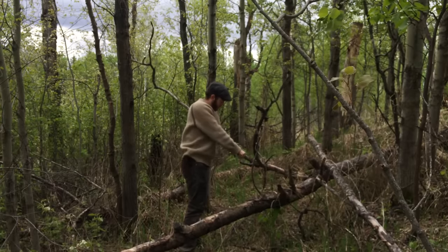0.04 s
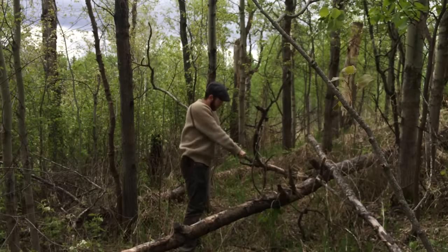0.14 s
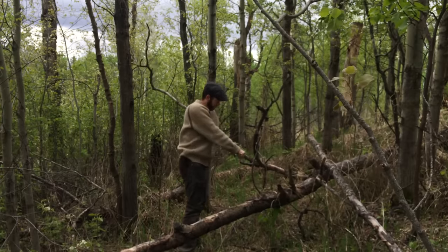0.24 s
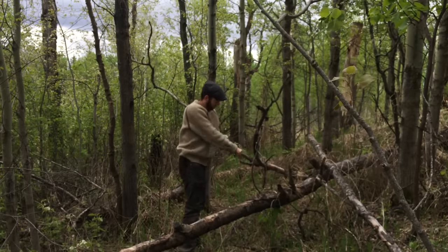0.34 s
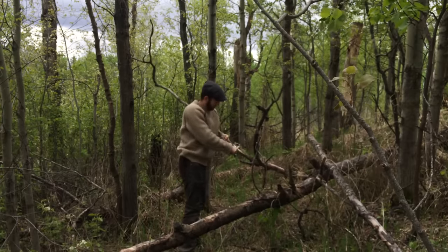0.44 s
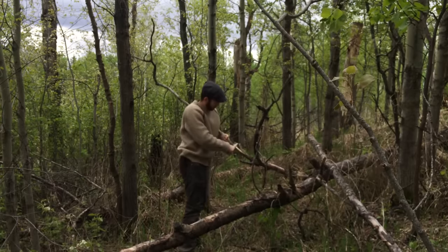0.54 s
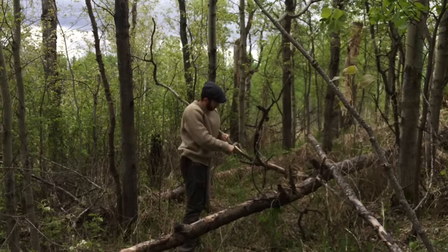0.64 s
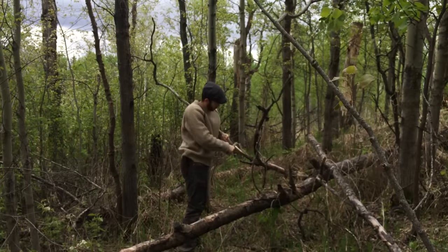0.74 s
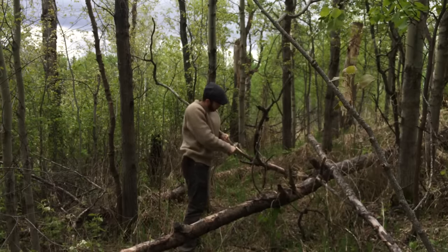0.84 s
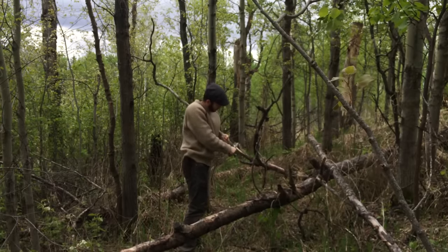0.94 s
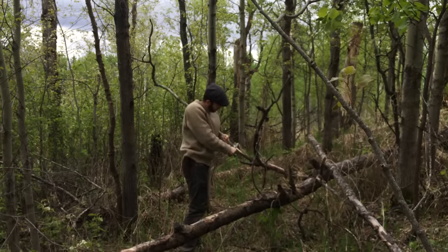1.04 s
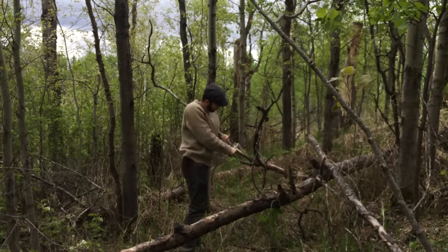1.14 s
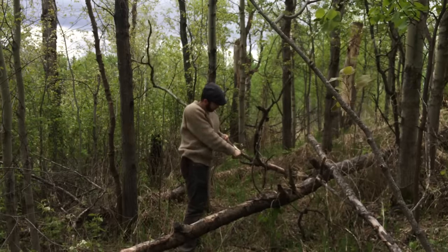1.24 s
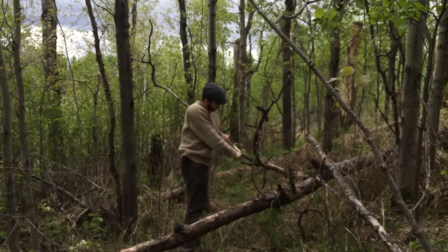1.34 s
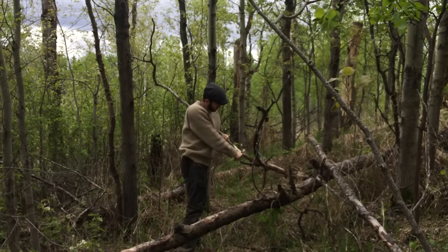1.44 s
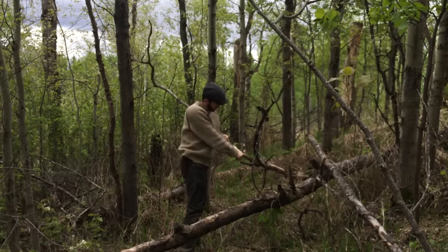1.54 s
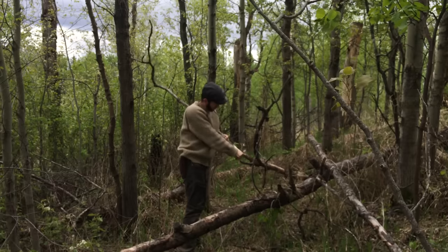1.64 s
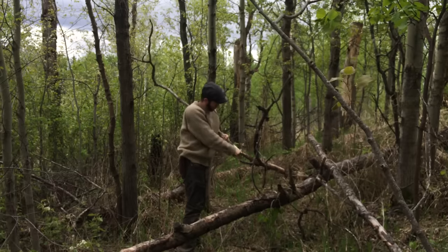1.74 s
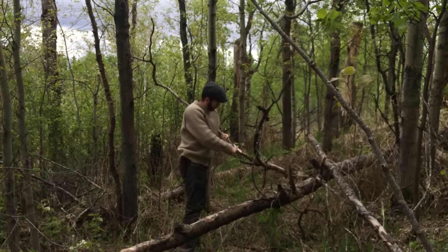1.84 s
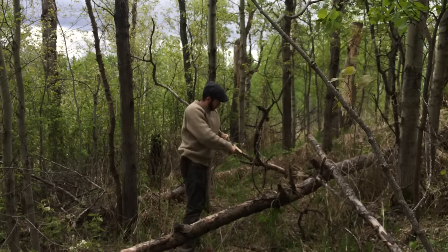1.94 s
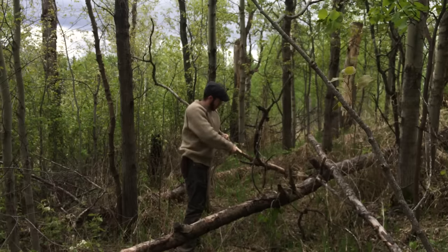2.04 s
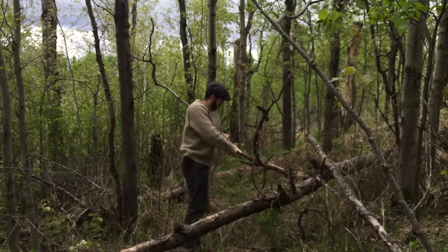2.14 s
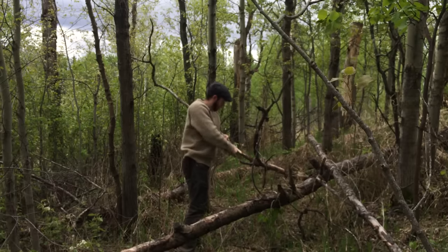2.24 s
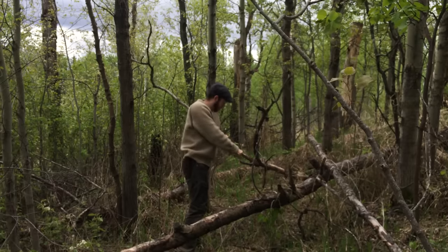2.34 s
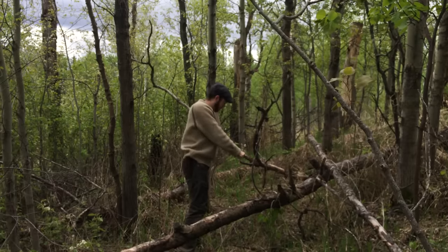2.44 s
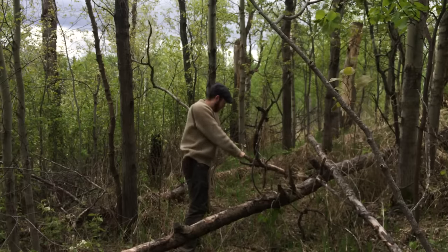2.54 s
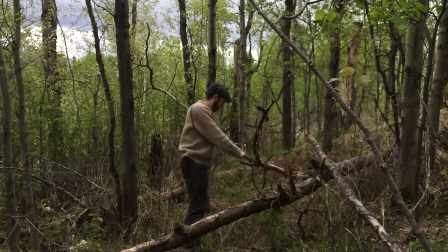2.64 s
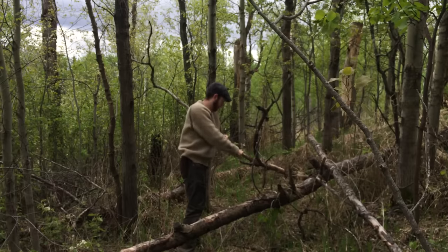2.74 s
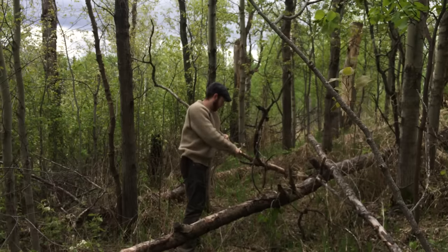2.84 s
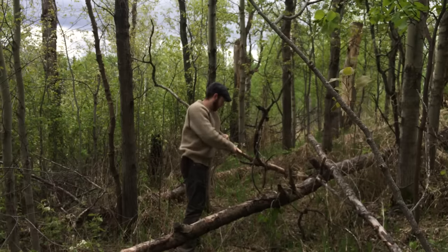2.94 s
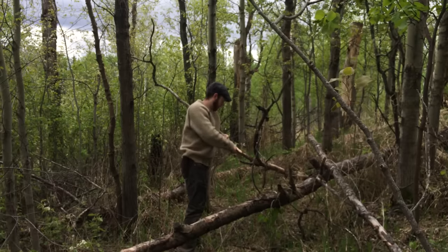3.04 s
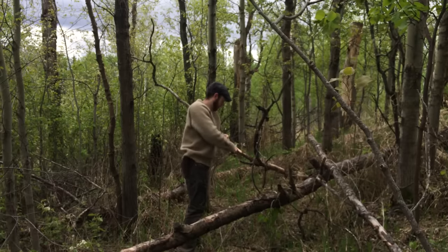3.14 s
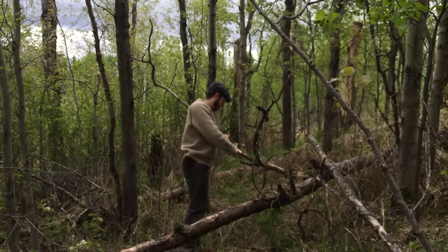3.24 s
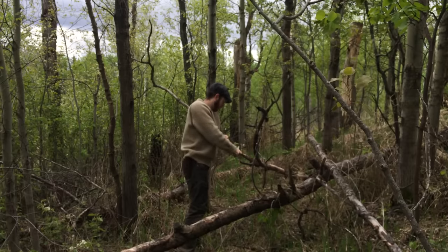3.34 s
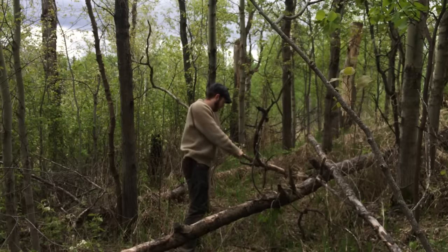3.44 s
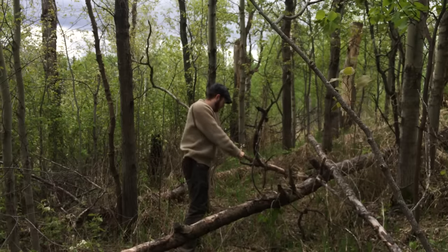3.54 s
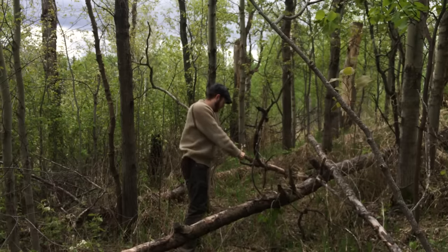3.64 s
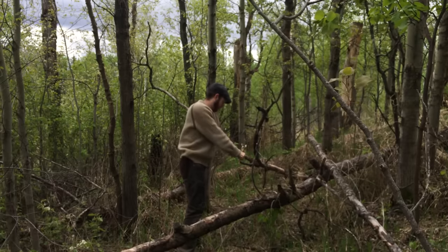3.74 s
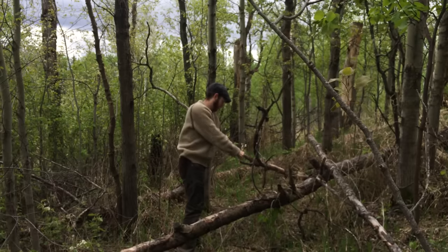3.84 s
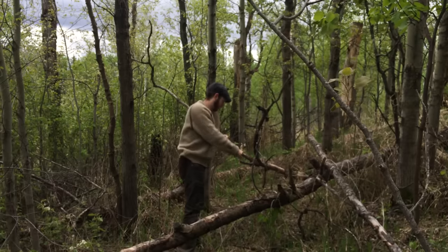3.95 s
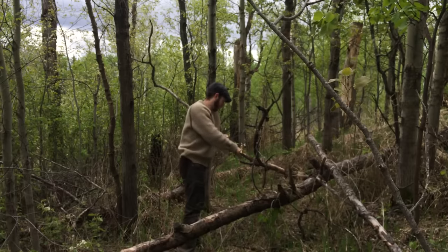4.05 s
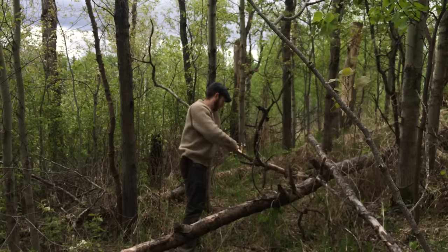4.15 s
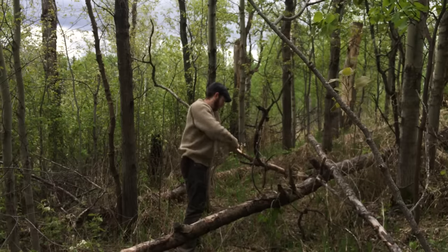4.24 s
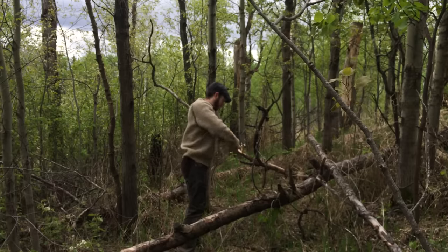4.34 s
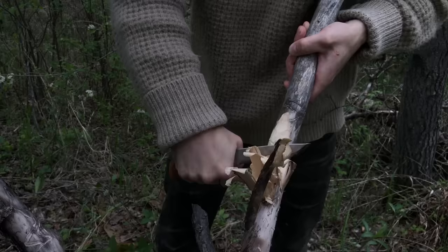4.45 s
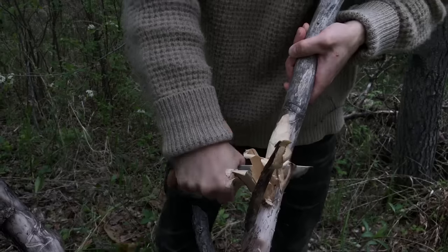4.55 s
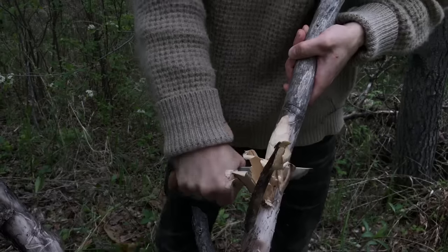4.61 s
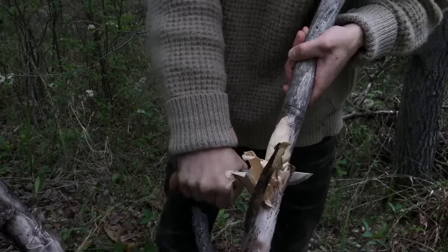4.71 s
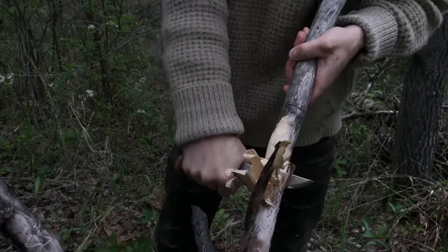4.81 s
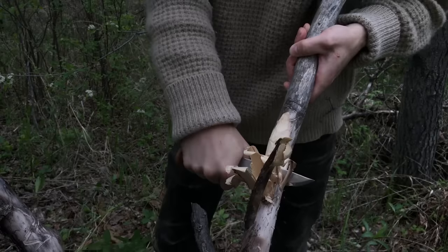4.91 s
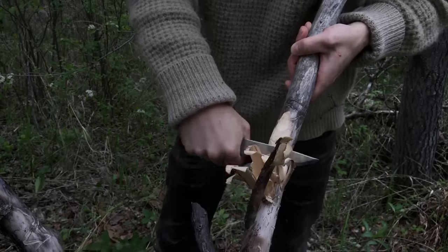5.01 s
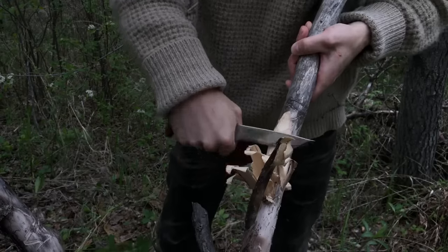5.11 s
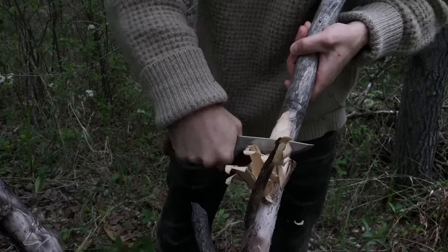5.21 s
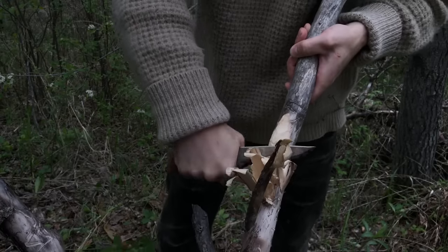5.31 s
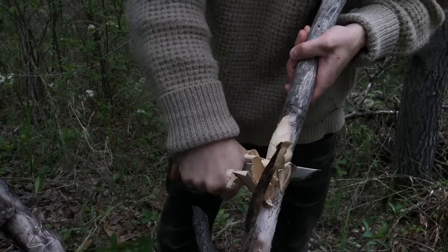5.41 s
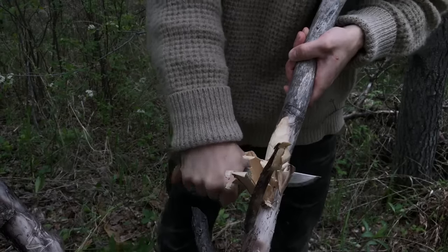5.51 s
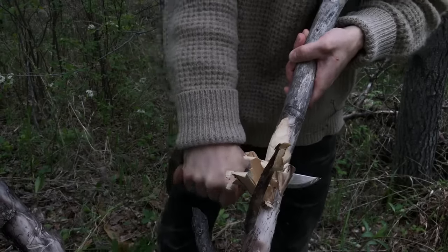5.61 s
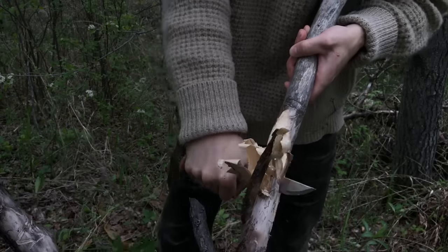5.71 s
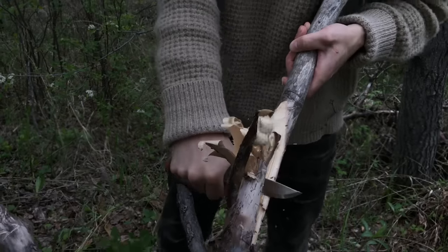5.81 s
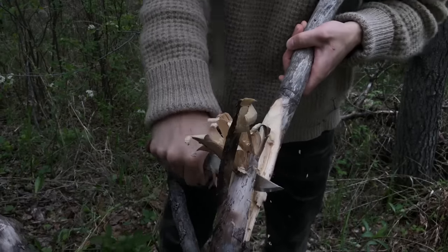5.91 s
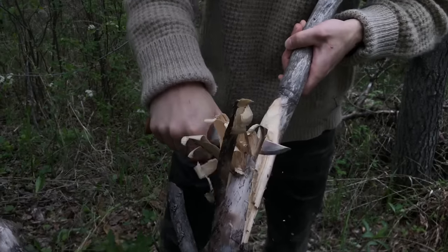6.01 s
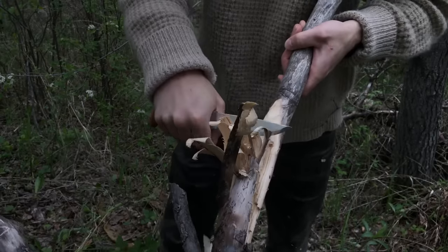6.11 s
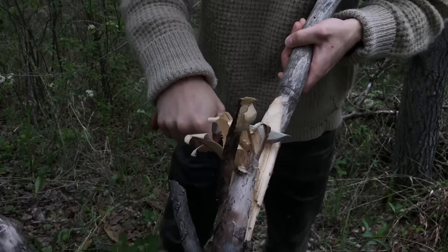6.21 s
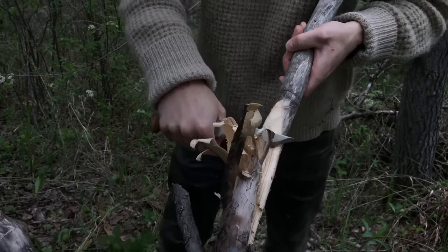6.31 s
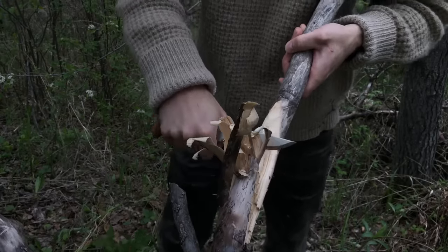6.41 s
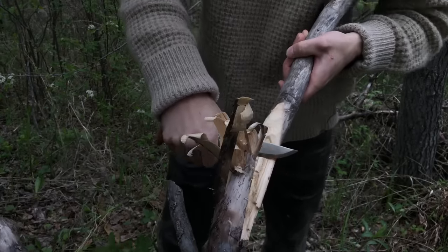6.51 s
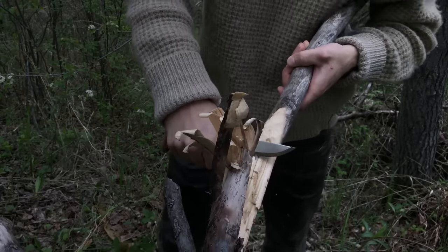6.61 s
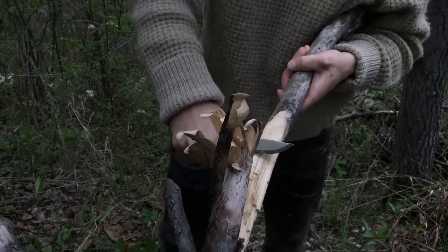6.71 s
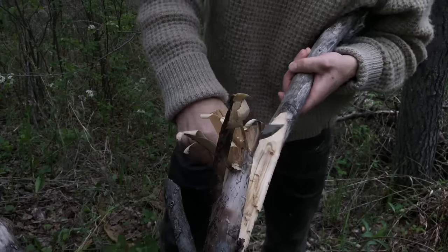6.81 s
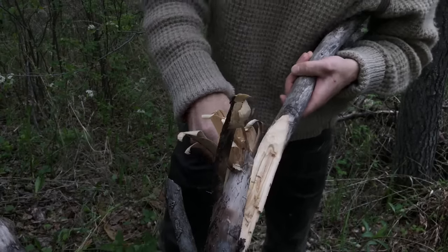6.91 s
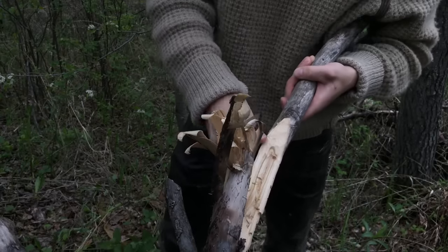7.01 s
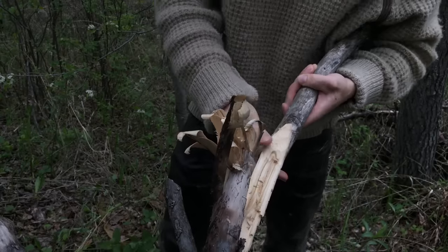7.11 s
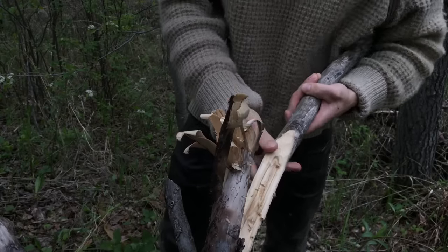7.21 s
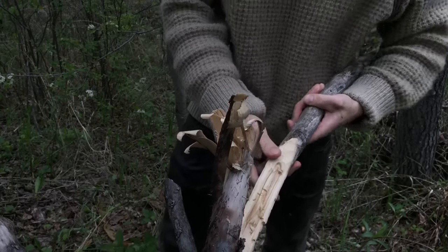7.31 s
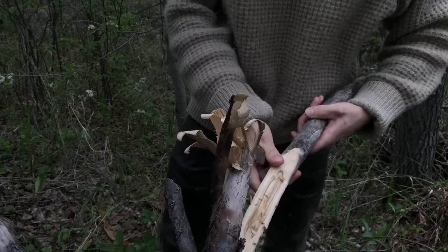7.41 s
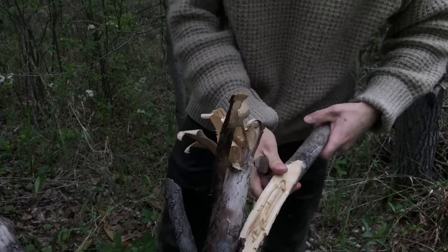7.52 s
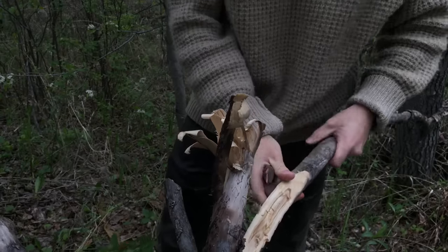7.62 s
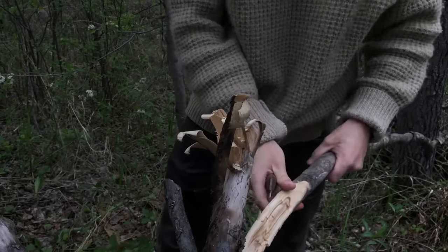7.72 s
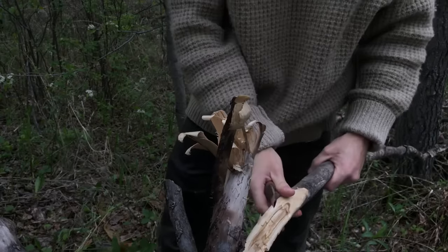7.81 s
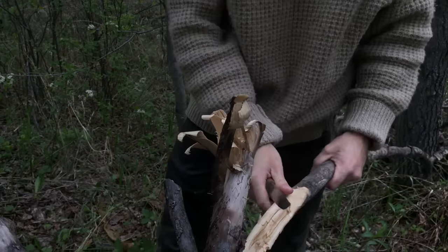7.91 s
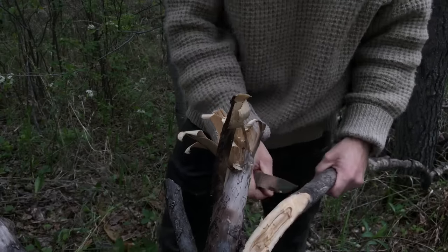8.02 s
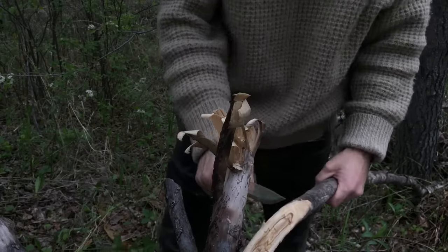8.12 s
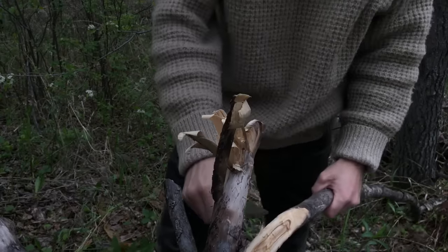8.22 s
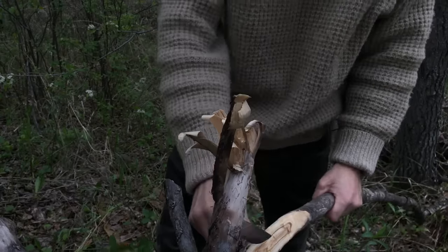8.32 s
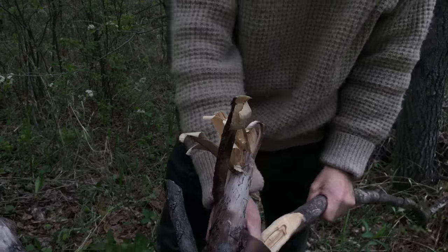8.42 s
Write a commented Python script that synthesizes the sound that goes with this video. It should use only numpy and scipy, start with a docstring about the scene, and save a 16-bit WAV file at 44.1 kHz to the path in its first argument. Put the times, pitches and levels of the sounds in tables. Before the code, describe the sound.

Distant, then close woodcutting outdoors. First, very soft clicks and short scrapes with a slight woodland echo, under a low hush of air and small birds. Then close-miked crackles and rasps in clusters, bark crumbs ticking and sleeves shuffling, leading to an explosive break of a dry branch, briefly distorted. Afterwards come hollow taps, scraping hands and blade, and scattered light cracks over quiet air.

```python
"""Small birds sing in a quiet wood while a knife trims a dry branch some metres off; then the work is close by.
The blade scrapes (noise bursts) and splinters crack (decaying noise), both shaped by branch resonances.
Knocks ring those resonances as decaying sines; a swept sine thumps at the big break and overloads the microphone.
Birds are gliding sines; air, sleeves and dull bumps are shaped noise; close by, bits of bark and leaf tick."""
import sys
import numpy as np
from scipy import signal
from scipy.fft import rfft, irfft
from scipy.io import wavfile
from scipy.ndimage import uniform_filter1d

SR = 44100
rng = np.random.default_rng(int(sys.argv[2]) if len(sys.argv) > 2 else 0)


def persist_wave(psi):
    """Save psi, clipped to +-1, as 16-bit WAV."""
    counts = np.round(np.clip(psi, -1, 1) * 32767).astype(np.int16)
    wavfile.write(sys.argv[1], SR, np.atleast_2d(counts).T)


N = 373086
T = np.arange(N) / SR

# fractures, fine splinters to the big break: (time [s], decay time [ms], level near 2.5 kHz [dB], brightness [dB])
FRACTURES = [(0.2402, 1.7, -25.5, 9), (.558, 2.9, -18.5, -33), (1.3975, 0.17, -25, 10),
             (1.3998, .15, -18, 6.5), (2.5531, 1.1, -26, 4), (3.5661, 5, -21, 12.5), (3.704, 3.7, -16, 5),
             (3.8642, 4.5, -17.5, 3), (4.65, 1.9, -7, -10), (4.6648, 2.4, -3.5, 1),
             (4.6927, 1.4, -24.5, 18), (4.769, 0.45, -32, 15), (4.7893, 1.3, -13.5, 4.5),
             (4.823, .6, -27.5, 14.5), (4.8489, 0.41, -13, 6), (4.925, 0.65, -16, 5),
             (4.9593, 1.46, -1.5, 8.5), (5.004, 1.2, 2, 6), (5.0135, 1, -11.5, 2), (5.51, 1.74, -7.5, -8.5),
             (5.547, 0.4, -20, 11.5), (5.5831, .6, -21, 18), (5.6026, 0.53, -25.5, 16.5),
             (5.6759, .7, -18.5, 8), (5.7039, 0.66, -25.5, 7.5), (5.8142, 0.68, -23, 8),
             (5.8576, 4.5, 22, -5), (5.8654, 0.83, 20.5, -5.5), (5.8802, 1, -6, 8), (5.9051, 1.2, 1, 1),
             (5.9087, 0.69, 13, -6), (5.9255, 2.2, 6.5, -2.5), (6.045, 2, -23.5, -3), (6.075, 2, -24, -2),
             (6.147, 3.3, -18.5, -12), (6.366, 2, -33.5, 11), (6.4192, 1.9, 3.5, -25),
             (6.5113, 1.5, -5, -39), (6.5758, 0.53, 7, -3.5), (6.5857, .7, -6, -7),
             (6.6248, 0.36, -4.5, 6.5), (7.217, 2.8, -13, 2), (7.2433, 3, 10, -3.5), (7.3127, 0.39, 1, -5),
             (7.452, .8, -24, 6.5), (7.4738, 2, -16, 7.5), (7.543, 2, -9, -2.5), (7.785, 2, -5.5, -6),
             (8.185, 3.8, -11.5, -2.5), (8.423, 2.1, -19, 8)]
# bites of blade or hand along the branch: (start [s], end [s], level near 2.5 kHz [dB], brightness [dB])
BLADE_STROKES = [(0, 0.039, -53.5, 9.5), (0.216, 0.249, -60.5, 9), (1.359, 1.389, -53, 10.5),
                 (1.608, 1.645, -57.5, 4.5), (2.437, 2.466, -50, -2.5), (2.502, 2.622, -62.5, 3.5),
                 (3.46, 3.471, -54.5, 5), (3.497, 3.516, -61.5, 13.5), (3.563, 3.594, -50, -5),
                 (4.003, 4.19, -56, 0.5), (4.12, 4.169, -55.5, 0.5), (4.65, 4.677, -34, -3),
                 (4.777, 4.869, -53.5, 3), (5.494, 5.562, -35.5, -8.5), (5.66, 5.668, -32.5, 2.5),
                 (5.838, 5.86, -44, -13), (5.872, 5.901, -40.5, 2), (5.925, 5.992, -51.5, 2.5),
                 (6.121, 6.23, -55, -10), (6.576, 6.597, -31, -5.5), (6.613, 6.65, -35, -5),
                 (6.646, 6.689, -46, -8), (6.698, 6.792, -39, -9), (7.103, 7.131, -51, -5.5),
                 (7.217, 7.243, -36, 3.5), (7.251, 7.404, -43.5, -1.5), (7.439, 7.489, -54, 4),
                 (7.533, 7.566, -42.5, -2), (7.58, 7.717, -50, -1), (7.719, 7.769, -35, -5.5),
                 (7.953, 8.079, -54, -4), (8.161, 8.224, -49, -0.5), (8.3, 8.467, -48.5, 1.5)]
# hollow knocks of blade and hand: (time [s], peak of the ring [dB], centre of the struck pitch range [Hz])
BRANCH_KNOCKS = [(.558, -40, 750), (2.447, -47, 900), (3.461, -45.5, 900), (4.662, -31.5, 200),
                 (5.153, -36, 716), (5.494, -33.5, 1163), (5.5095, -28.5, 1010), (5.8595, -8.5, 616),
                 (5.926, -28, 648), (6.42, -29, 1350), (6.513, -34.5, 1350), (6.706, -27.5, 1210),
                 (6.734, -36, 1100), (6.748, -29, 980), (6.771, -27.5, 1000), (7.244, -30, 590),
                 (6.822, -38.5, 1150), (7.721, -29.5, 844), (7.7425, -28.5, 780), (7.7965, -31, 1100),
                 (7.96, -36, 750), (8.049, -40, 1070)]
# branch resonances: (frequency [Hz], width [Hz], lift [dB])
BRANCH_MODES = [(208, 48, 2), (340, 45, 9), (580, 61, -0.5), (681.4, 59, 2), (906, 55, 2), (1122, 79, 5),
                (1467, 200, -0.5), (2019, 65, 6.5), (2490, 73, 2.5), (2830, 90, 4.5), (3215, 160, 1.5),
                (4170, 250, 1)]
# thinner pieces lose body and gain air: (body [dB], body lost per dB of brightness [dB/dB],
# air [dB], air gained per dB of brightness [dB/dB])
FRACTURE_COLOUR = (-6.5, .5, -8, 0.96)
STROKE_TONE_COLOUR = (-0.38, 0.86, -3.3, 0.91)
# arm movements that shuffle sleeves and hands: (middle [s], length [s], level [dB])
ARM_MOVES = [(.05, 0.73, -64), (3.546, .35, -63.5), (4.13, 0.63, -61), (4.716, 0.31, -65.5),
             (5.578, 0.25, -63.5), (6.182, 0.12, -68.5), (6.666, 0.27, -56), (7.944, .4, -63)]
# single sagging whistles: (time [s], length [s], last frequency [Hz], level [dB])
BIRD_WHISTLES = [(.016, 0.18, 3850, -69), (0.192, 0.204, 3830, -67), (.28, 0.091, 2430, -65),
                 (1.22, 0.066, 2420, -73.5), (1.405, 0.058, 2440, -63), (2.565, 0.056, 2440, -65.5)]
# two-note calls: (time [s], level of the long note [dB])
TWO_NOTE_CALLS = [(.693, -63), (1.865, -67), (3.095, -65.5)]
# notes of a call: (length [s], first frequency [Hz], last frequency [Hz])
CALL_LONG_NOTE = (0.11, 3080, 2715)
CALL_SHORT_NOTE = (0.033, 3020, 2860)
# rising trills: (time [s], level [dB])
BIRD_TRILLS = [(0.322, -57.5), (2.215, -53)]
# spectrum of the forest air, far and near: (frequency [Hz], relative level [dB])
FAR_AIR_SPECTRUM = [(15, -48), (25, -31), (82, 3.5), (289, -19), (410, -12.5), (631, -17), (722, -8),
                    (804, -14.5), (1050, -16.5), (1620, -26.5), (2560, -27), (2770, -29.5), (3260, -31.5),
                    (15500, -41.5)]
NEAR_AIR_SPECTRUM = [(15, -32), (25, -7), (91, 4), (281, -16), (457, -14.5), (722, -32), (804, -18),
                     (997, -13.5), (1110, -13), (1240, -18.5), (2700, -19), (3260, -21.5), (15500, -36.5)]

FAR_AIR_DB, NEAR_AIR_DB = -61.5, -60.5
NEAR_FROM_S = 4.5
LOW_CUT_HZ, TOP_HZ, CEILING = 33, 16100, 0.66
FULL_BODY_DB = -5  # brightness below which a piece gains no more body
QUICK_AIR_DB = 3  # air lift of a 1 ms fracture, inverse to its decay time
SLIDE_SHARE, SLIDE_DB = 1, -14.5  # slide after a bite: length ratio and level, relative to the bite
STILL_DB = -71  # shuffle between movements
WHISTLE_SAG_HZ = 84
SHORT_AFTER_S, SHORT_DB = 0.152, -4.5  # short note of a call, relative to the long one


def undb(db):
    """Decibels to gain."""
    return 10 ** (np.asarray(db) / 20)


def add(track, time_s, sound):
    """Mix a sound into the track at a time."""
    i = max(int(time_s * SR), 0)
    track[i:i + len(sound)] += sound[:max(N - i, 0)]


def unit(x):
    """Scale to rms 1."""
    return x / np.sqrt(np.mean(x ** 2))


def contour(hz, points):
    """Join (frequency [Hz], level [dB]) points on a log-frequency axis."""
    f, db = np.transpose(points)
    return np.interp(np.log(hz + 1), np.log(f), db)


def walk(size, rate_hz):
    """Random wander of spread near 1: linear between random knots."""
    place = np.arange(size) * rate_hz / SR
    knots = rng.standard_normal(int(place[-1]) + 2)
    return 1.29 * np.interp(place, np.arange(len(knots)), knots)


def noise(points):
    """Noise of rms 1 with the given spectrum."""
    hz = np.fft.rfftfreq(N, 1 / SR)
    spectrum = rfft(rng.standard_normal(N)) * undb(contour(hz, points))
    return unit(irfft(spectrum, N))


def colour(brightness_db, body_db, body_loss, air_db, air_gain):
    """Body, edge and air levels [dB] of a piece of wood of the given brightness."""
    body = body_db - body_loss * max(brightness_db, FULL_BODY_DB)
    air_level = air_db + air_gain * brightness_db
    return body, brightness_db, air_level


def branch(force, db, body_db, edge_db, air_db, bass_db, size=2048):
    """Ring the branch with a force; its resonances shift a little with the grip and the place of the cut."""
    hz = np.fft.rfftfreq(size, 1 / SR)
    tone = contour(hz, [(40, body_db + bass_db - 12.5), (220, body_db + bass_db), (650, body_db), (950, body_db),
                        (1700, 0.0072), (3400, 0.0023), (6500, edge_db), (12500, air_db)])
    grip = 1 + 0.02 * rng.standard_normal()
    ring = sum(lift / (1 + (2 * (hz - f * grip) / width) ** 2) for f, width, lift in BRANCH_MODES)
    ring = ring - uniform_filter1d(ring, size=81)
    # fold the cepstrum to get a causal response: all ringing follows the blow
    cepstrum = irfft(np.log(undb(db + tone + ring)))
    cepstrum[1:size // 2] *= 2
    cepstrum[size // 2 + 1:] = 0
    response = irfft(np.exp(rfft(cepstrum)))
    return signal.fftconvolve(force, response)


def bites_and_slides():
    """Every stroke bites, then slides on more lightly."""
    for start, end, db, brightness_db in BLADE_STROKES:
        tone = colour(brightness_db, *STROKE_TONE_COLOUR)
        yield start, end, db, *tone
        yield end, end + SLIDE_SHARE * (end - start), db + SLIDE_DB, *tone


def strokes(fibres_per_s=900, scatter_db=4.0, rub=0.87, catch_db=3.5, catch_hz=130,
            snag_db=4.0, snag_hz=40, bass_db=-5, spill=0.2):
    """The blade catches and slips, tearing fibres of unequal size over a steady rub; pressure swells and eases."""
    out = np.zeros(N)
    coarse = signal.butter(2, 2500, fs=SR, output="sos")
    for start, end, *tone in bites_and_slides():
        length_s = max(end - start, 0.005)
        n = int(length_s * (1 + 2 * spill) * SR)
        sizes = undb(scatter_db * np.minimum(rng.exponential(size=n), 4))
        tears = (rng.random(n) < fibres_per_s / SR) * sizes * rng.choice([-1, 1], n)
        grain = unit(tears + 1e-3 * rng.standard_normal(n)) + rub * rng.standard_normal(n)
        # thick fibres and fine bark snag at their own moments
        thick = signal.sosfiltfilt(coarse, grain)
        fine = grain - thick
        grain = thick * undb(snag_db * walk(n, snag_hz)) + fine * undb(snag_db * walk(n, snag_hz))
        pressure = np.sin(np.pi * np.linspace(0, 1, n) ** 0.85).clip(0) ** 1.27
        catching = undb(catch_db * walk(n, catch_hz))
        force = unit(grain * pressure * catching) / np.sqrt(1 + 2 * spill)
        add(out, start - spill * length_s, branch(force, *tone, bass_db))
    return out


def snaps(after_db=-17, after_s=0.0017, bass_db=-8):
    """Each fracture runs through the fibres as decaying noise; torn ends quiver briefly after it."""
    out, t = np.zeros(N), T[:SR // 20]
    for time_s, decay_ms, db, brightness_db in FRACTURES:
        run = np.exp(-t * 1e3 / decay_ms)
        quiver = undb(after_db) * np.exp(-t / after_s)
        force = rng.standard_normal(len(t)) * (run + quiver)
        # a brittle break holds all pitches about equally
        spectrum = rfft(force, 2 * len(t))
        spectrum /= np.sqrt(uniform_filter1d(np.abs(spectrum) ** 2, size=70))
        force = irfft(spectrum)[:len(t)]
        body_db, edge_db, air_db = colour(brightness_db, *FRACTURE_COLOUR)
        air_db += QUICK_AIR_DB / decay_ms
        add(out, time_s, branch(force, db, body_db, edge_db, air_db, bass_db))
    return out


def thump(time_s=5.8657, db=7, sweep_hz=390, rest_hz=48, settle_s=0.0027, fade_s=0.0105, stop_s=0.035):
    """The jolt of the big break reaches the microphone: a heavy swing that slows at once to a deep throb."""
    out, t = np.zeros(N), T[:SR // 8]
    cycles = rest_hz * t + sweep_hz * settle_s * (1 - np.exp(-t / settle_s))
    swing = np.exp(-t / fade_s) / (1 + (t / stop_s) ** 8)
    add(out, time_s, -undb(db) * swing * np.sin(2 * np.pi * cycles))
    return out


def knocks(reach_octaves=0.6, contact_s=0.0013, tick_db=-15, tick_s=0.0065):
    """A dull blow rings the resonances near its pitch range; the contact chatters and shifts them a little."""
    out, t = np.zeros(N), T[:SR // 8]
    hz, width_hz, lift_db = np.transpose(BRANCH_MODES)[:, :, None]
    for time_s, db, centre_hz in BRANCH_KNOCKS:
        share = undb(lift_db) / (1 + (np.log2(hz / centre_hz) / reach_octaves) ** 4)
        shifted_hz = hz * (1 + 0.0065 * rng.standard_normal(hz.shape))
        phase = 2 * np.pi * (shifted_hz * t + rng.random(hz.shape))
        ring = np.sum(share * np.exp(-np.pi * width_hz * t) * np.sin(phase), axis=0)
        ring *= (1 - np.exp(-t / contact_s)) * undb(2 * walk(len(t), 770))
        # rough bark adds a short tick at the contact
        tick = uniform_filter1d(rng.standard_normal(len(t)), size=2) * np.exp(-t / tick_s)
        add(out, time_s, undb(db) * (ring / np.abs(ring).max() + undb(tick_db) * tick))
    return out


def motion():
    """How hard the arms move: each movement swells and fades over a slight steady stir."""
    power = undb(STILL_DB) ** 2
    for middle_s, length_s, db in ARM_MOVES:
        power = power + (undb(db) * np.exp(-2 * ((T - middle_s) / length_s) ** 2)) ** 2
    return np.sqrt(power)


def crumbs(per_s=80, db=-5):
    """Bits of bark and dry leaf tick under the hands, more often and louder as they move harder."""
    moving = motion()
    chance = per_s / SR * (moving / moving.mean()) ** 2
    ticks = rng.standard_normal(N) * (rng.random(N) < chance)
    crisp = np.exp(-T[:SR // 200] / 0.00072) * rng.standard_normal(SR // 200)
    rustle = branch(signal.fftconvolve(ticks, crisp), 0, 0, -6.5, -8.5, -12.5)[:N]
    return unit(rustle) * undb(db) * moving


def note(length_s, first_hz, last_hz, db):
    """One whistled note: a sine that glides, wavers and levels out."""
    u = np.linspace(0, 1, int(length_s * SR))
    hz = last_hz + (first_hz - last_hz) * (1 - u) ** 2 + 20 * walk(len(u), 144)
    loudness = undb(db + 2 * walk(len(u), 51)) * np.sin(np.pi * u).clip(0) ** 0.5
    return loudness * np.sin(2 * np.pi * np.cumsum(hz) / SR)


def birds(count=11, gap_s=0.036, slowing_s=0.0014, low_hz=2970, rise_hz=38, flick_hz=360):
    """Plain whistles, two-note calls, and trills whose notes climb, swell and draw out."""
    out = np.zeros(N)
    for time_s, length_s, hz, db in BIRD_WHISTLES:
        add(out, time_s, note(length_s, hz + WHISTLE_SAG_HZ, hz, db))
    for time_s, db in TWO_NOTE_CALLS:
        add(out, time_s, note(*CALL_LONG_NOTE, db))
        add(out, time_s + SHORT_AFTER_S, note(*CALL_SHORT_NOTE, db + SHORT_DB))
    for time_s, db in BIRD_TRILLS:
        for k in range(count):
            hz = low_hz + rise_hz * k + 20 * rng.standard_normal()
            start = time_s + gap_s * k + slowing_s * k ** 2
            loud_db = db - 1.5 - 0.3 * (k - 7) ** 2
            # each syllable flicks down, then a softer turn climbs back
            add(out, start, note(0.011, hz + flick_hz, hz, loud_db))
            turn = note(0.0043 + 0.001 * k, hz - flick_hz / 4, hz + flick_hz, loud_db - 15)
            add(out, start + 0.009, turn)
    return out


def trees(x, near_db, near_t60_s, far_db, far_t60_s):
    """Scatter from the ground and nearby trunks, then a faint, duller echo from deep in the wood."""
    t = T[:SR]
    chance = rng.standard_normal((2, SR))
    close = chance[0] * np.exp(-np.log(1000) * t / near_t60_s) * (t > 0.003)
    deep = signal.sosfilt(signal.butter(1, [500, 4500], "band", fs=SR, output="sos"), chance[1])
    deep = deep * np.exp(-np.log(1000) * t / far_t60_s) * (1 - np.exp(-t / 0.022))
    response = (undb(near_db) * unit(close) + undb(far_db) * unit(deep)) / np.sqrt(SR)
    return x + signal.fftconvolve(x, response)[:N]


def air(near, bump_db=-1):
    """Low rumble and a thin hush of leaves; arm moves add a soft shuffle and, close by, dull bumps."""
    far_air = noise(FAR_AIR_SPECTRUM) * undb(FAR_AIR_DB + 0.3 * walk(N, 5.02))
    near_air = noise(NEAR_AIR_SPECTRUM) * undb(NEAR_AIR_DB + 1.8 * walk(N, 6.9))
    cloth = noise([(90, -13), (250, -5.0), (480, -1), (750, -2), (1300, -16.5), (4000, -24), (15000, -38)])
    cloth *= undb(2.4 * walk(N, 35))
    bumps = noise([(20, -29.0), (60, 2.5), (190, -5.5), (400, -31.5), (2000, -73.5)])
    bumps *= undb(bump_db + 2 * walk(N, 11))
    return (1 - near) * far_air + near * near_air + motion() * (cloth + near * bumps)


def scene():
    """The work is heard with more of the forest from afar, and nearly dry from close by."""
    near = np.clip((T - NEAR_FROM_S) * 100, 0, 1)  # 10 ms crossfade
    work = strokes() + snaps() + knocks() + near * crumbs()
    distant = trees(work * (1 - near), near_db=-6, near_t60_s=0.16, far_db=-30.5, far_t60_s=0.98)
    close = trees(work * near, near_db=-14, near_t60_s=0.084, far_db=-37.5, far_t60_s=0.6)
    song = trees(birds(), near_db=-2.5, near_t60_s=0.093, far_db=-8.5, far_t60_s=0.55)
    return (distant + close + thump() + song + air(near))[None]


def record(dry):
    """The microphone sheds the deepest bass, its input stage flattens the big break, and the top is cut."""
    heard = signal.sosfilt(signal.butter(2, LOW_CUT_HZ, "high", fs=SR, output="sos"), dry)
    squashed = heard / (1 + (heard / CEILING) ** 4) ** (1 / 4)
    return signal.sosfilt(signal.ellip(8, 0.2, 70, TOP_HZ, fs=SR, output="sos"), squashed)


dry = scene()
out = record(dry)
persist_wave(out)
```